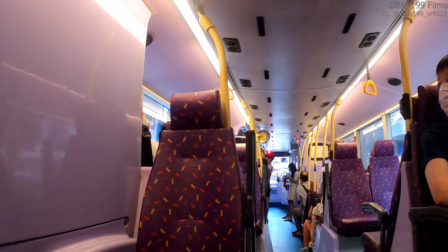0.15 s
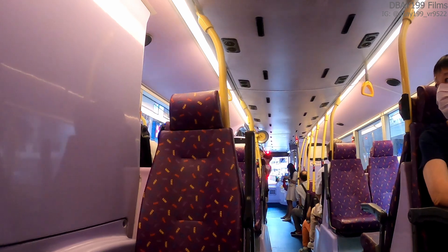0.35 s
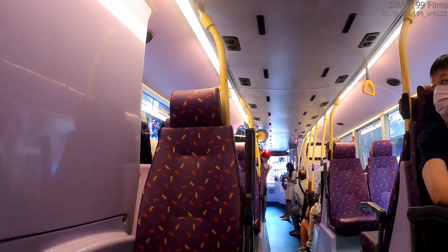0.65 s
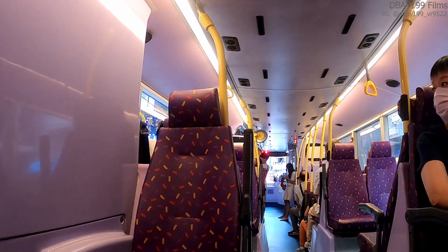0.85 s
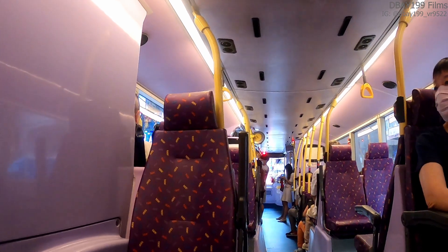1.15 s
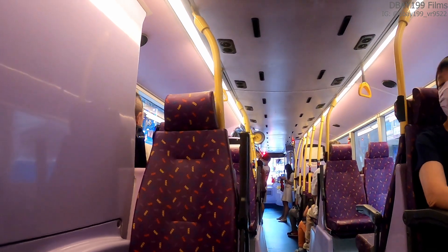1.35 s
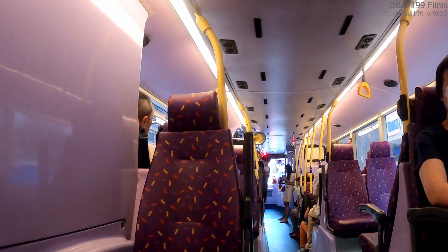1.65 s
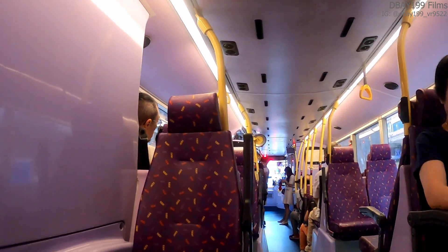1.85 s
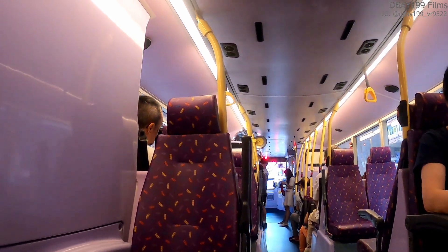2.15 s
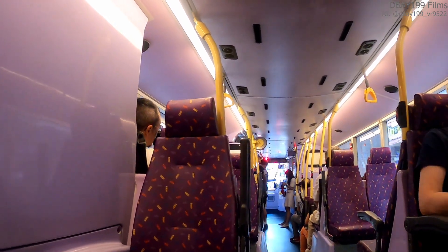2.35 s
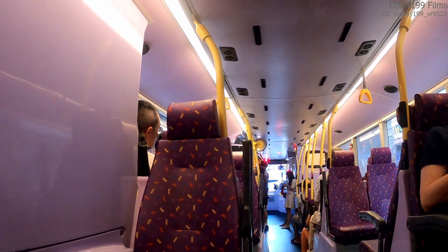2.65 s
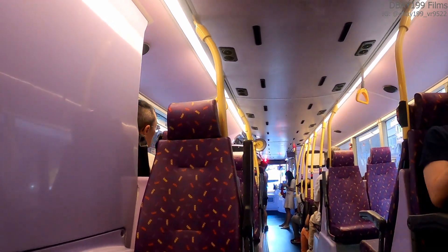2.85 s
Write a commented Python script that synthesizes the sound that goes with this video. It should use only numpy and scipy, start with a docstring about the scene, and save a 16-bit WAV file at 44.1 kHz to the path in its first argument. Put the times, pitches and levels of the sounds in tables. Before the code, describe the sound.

Inside a moving city bus, a continuous deep engine drone dips early and rises late; panels hum, fans blow softly with a thin whistle, and small fittings rattle faintly around the seated microphone.

```python
"""Inside a moving city bus. The diesel booms at its firing rate, sagging and then picking up again;
its orders are sines. Road rumble and vent air are shaped noise; body panels drone with noise and orders.
Fans are unsteady tones, with a whistle among them that fades, then swells late, and a thin whine.
Trim and fittings tick and rattle in short noise bursts; one small metal part pings."""
import sys
import numpy as np
from scipy import signal
from scipy.fft import rfft, irfft, next_fast_len
from scipy.io import wavfile
from scipy.ndimage import uniform_filter1d, minimum_filter1d, map_coordinates

SR = 44100
rng = np.random.default_rng(int(sys.argv[2]) if len(sys.argv) > 2 else 0)


def pcm_store(signal):
    """Save signal as 16-bit PCM."""
    levels = np.round(np.clip(np.atleast_2d(signal), -1, 1) * 32767)
    wavfile.write(sys.argv[1], SR, levels.astype(np.int16).T)


N = 132300
TOP_HZ = 15200  # upper band limit


def amp(db):
    """Decibels to gain."""
    return 10 ** (np.asarray(db) / 20)


def unit(x):
    """Scale to rms 1."""
    return x / np.sqrt(np.mean(x ** 2) + 1e-20)


def along(points, hz):
    """Interpolate (f/Hz, value) points on a log-frequency axis."""
    f, v = np.transpose(points)
    return np.interp(np.log(hz + 1), np.log(f + 1), v)


def curve(rows):
    """Interpolate (t/s, value) points to one value per sample."""
    return np.interp(np.arange(N) / SR, *np.transpose(rows))


def wobble(knots_per_s):
    """Smooth random curve through normal knots."""
    knots = rng.standard_normal(2000)
    return map_coordinates(knots, [np.arange(N) * knots_per_s / SR], mode="mirror")


def filtered(x, response):
    """Apply a frequency response, zero-padded."""
    m = next_fast_len(N + SR // 2)
    return irfft(rfft(x, m) * response(np.fft.rfftfreq(m, 1 / SR)), m)[..., :N]


def pan(db):
    """Left and right gains for a left-minus-right level difference."""
    return amp(np.array([[.5], [-.5]]) * db)


def steady(x):
    """Even out slow chance swells of a noise; rms 1."""
    power = uniform_filter1d(np.mean(x ** 2, axis=0), size=9000)
    return unit(x / np.sqrt(np.abs(power) + 1e-12))


# cabin diffuseness: f/Hz, left-right likeness
CABIN_ALIKE = [(60, 0.98), (250, 1), (450, 0.92), (700, 0.75), (1300, 0.86), (2200, 0.49), (3600, 0.29),
               (8000, 0.18)]
# noise balance: f/Hz, left-right level/dB
NOISE_LEAN = [(30, 0.5), (250, 2), (700, 1.5), (2700, 4), (3600, 3), (5400, 0), (8000, 0.5)]


def rush(colour, patchy_db, alike=CABIN_ALIKE):
    """Patchy stereo noise of rms 1; left-right likeness follows frequency."""
    z = signal.stft(rng.standard_normal((2, N)), nperseg=1024)[2]
    field = rng.standard_normal(z.shape[1:])
    field = uniform_filter1d(field, size=7, axis=0)  # across frequency
    field = uniform_filter1d(field, size=9, axis=1)  # across time
    pair = signal.istft(z * amp(patchy_db * unit(field)), nperseg=1024)[1][:, :N]

    def mid_side(hz):
        turn = np.arccos(np.clip(along(alike, hz), -1, 1)) / 2
        return colour(hz) * [np.cos(turn), np.sin(turn)]

    mid, side = filtered(pair, mid_side)
    stereo = np.array([mid + side, mid - side])
    return unit(filtered(stereo, lambda hz: pan(along(NOISE_LEAN, hz))))


# engine firing rate: t/s, f/Hz
FIRING = [(0, 53.79), (.15, 50.66), (.35, 48.36), (.52, 42.39), (.7, 43.37), (.92, 46.35), (1.15, 44.29),
          (1.55, 45.31), (1.85, 46.5), (2.05, 51.89), (2.5, 51.98), (3, 54.79)]


def firing_phase():
    """Integrate the firing rate to phase in radians."""
    return 2 * np.pi * np.cumsum(curve(FIRING)) / SR


# cabin boom at the firing rate: t/s, level/dB
BOOM = [(0, -19), (.1, -16), (.2, -26.5), (.32, -16), (.7, -15), (1.1, -16), (1.5, -17), (1.85, -14.5),
        (2.1, -24.5), (2.35, -24.5), (3, -20)]
# how hard the engine pulls: t/s, pull (0-1)
PULL = [(0, .6), (.4, 0.3), (1.9, 0), (2.25, 0.94), (3, 1)]
# engine orders: multiple of firing rate, easy level/dB, pulling level/dB
ENGINE_ORDERS = [(.5, -30, -28.5), (1.5, -34.5, -31), (2, -30, -30.5), (2.5, -38.5, -39.5),
                 (4, -48.5, -40.5), (5, -44.5, -40)]


def engine(phase):
    """Firing-rate boom plus weaker wavering orders whose levels shift with pull."""
    boom = amp(curve(BOOM) + 0.39 * wobble(5.3)) * np.sin(phase)
    pull = curve(PULL)
    orders = 0
    for k, easy_db, pull_db in ENGINE_ORDERS:
        level_db = easy_db + pull * (pull_db - easy_db) + 2.26 * wobble(8.3)
        start = rng.uniform(0, 2 * np.pi)
        orders = orders + amp(level_db) * np.sin(k * phase + start + .5 * wobble(7.4))
    return np.sqrt(2) * (boom + orders) * pan(db=.5)


# rumble spectrum: f/Hz, relative level/dB
ROAD_COLOUR = [(5, -30), (11, -7), (22, 1.5), (33, 6), (50, 0), (64, -7.5), (85, -2), (102, -13),
               (150, -22.5), (250, -44.5), (500, -83.5)]
# rumble: t/s, level/dB
ROAD_LEVEL = [(0, -22.5), (.3, -20), (.5, -22.5), (.7, -24.5), (1, -24), (1.3, -18.5), (1.55, -20.5),
              (1.8, -21), (2.1, -19), (2.5, -19), (3, -19)]
# rumble, near mono: f/Hz, left-right likeness
ROAD_ALIKE = [(60, .9998), (250, .995)]


def road():
    """Tyres shake the body: deep noise rumble."""
    rumble = rush(lambda hz: amp(along(ROAD_COLOUR, hz)), patchy_db=1, alike=ROAD_ALIKE)
    return amp(curve(ROAD_LEVEL)) * steady(rumble)


# panel resonances: f/Hz, relative level/dB
PANEL_COLOUR = [(70, -28), (125, 1), (155, -7), (200, -1.5), (228, -1.5), (258, -2), (278, -3), (298, -8),
                (328, -4.5), (350, -8.5), (390, -6.5), (440, -11), (500, -11.5), (600, -18.5), (1000, -31),
                (2500, -77.5)]
# panel drone: t/s, level/dB
PANEL_LEVEL = [(0, -27.5), (.25, -28), (.45, -30), (1, -30), (1.35, -32), (1.8, -30), (2.3, -30),
               (2.7, -29), (3, -26)]
PARTIALS_DB = -1.5  # orders re panel noise


def panels(phase):
    """Panels drone with road noise and engine orders sliding across their resonances."""
    firing_hz = curve(FIRING)
    partials = 0
    for k in np.arange(3, 10, .5):
        level_db = along(PANEL_COLOUR, k * firing_hz) + 2.6 * wobble(6)
        start = rng.uniform(0, 2 * np.pi)
        partials = partials + amp(level_db) * np.sin(k * phase + start + 0.83 * wobble(8))
    noise = rush(lambda hz: amp(along(PANEL_COLOUR, hz)), patchy_db=0.5)
    drone = noise + amp(PARTIALS_DB) * unit(partials) * pan(db=0.2)
    return amp(curve(PANEL_LEVEL)) * steady(drone)


RIPPLE_DB, RIPPLE_HZ = 1.8, 14  # standard deviation, knot spacing


def ripple(hz):
    """Cabin reflections comb the spectrum into fine fixed peaks and dips."""
    knots = rng.standard_normal(4000)
    return amp(RIPPLE_DB * map_coordinates(knots, [hz / RIPPLE_HZ], mode="mirror"))


# vent air spectrum: f/Hz, relative level/dB
AIR_COLOUR = [(200, -35), (600, -2.5), (660, -1), (705, 5), (780, -2), (1100, -2), (1400, -0.5), (1650, -5),
              (2000, -5), (2400, -7.5), (3000, -8), (4600, -14.5), (5800, -19.5), (7000, -23),
              (8400, -25.5), (9500, -38), (11000, -44), (13000, -49.5), (15000, -60.5)]
# vent air: t/s, level/dB
AIR_LEVEL = [(0, -36.5), (.3, -37.5), (.65, -39), (1, -38.5), (1.45, -39.5), (1.9, -39.5), (2.4, -38),
             (2.75, -37.5), (3, -36)]
# outlet resonances: f/Hz, half-width at -12 dB/Hz, relative level/dB
WHISTLE_BANDS = [(3236, 150, -5), (3398, 170, -2), (3590, 310, -3), (3807, 480, -5), (5204, 92, -10.5),
                 (5510, 410, -15.5)]
# whistling bands: t/s, level/dB
WHISTLE_LEVEL = [(0, -40.5), (.5, -40.5), (.9, -42), (1.45, -43.5), (1.8, -41), (2.3, -41.5), (2.75, -40),
                 (3, -40.5)]


def whistle_response(hz):
    """Power sum of the outlet resonances."""
    power = 0
    for centre_hz, width_hz, db in WHISTLE_BANDS:
        power = power + (amp(db) / (1 + ((hz - centre_hz) / width_hz) ** 2) ** 2) ** 2
    return np.sqrt(power)


def vents():
    """Broad air noise plus noise in the outlets' whistling bands."""
    # square root halves the ripple in dB
    air = rush(lambda hz: amp(along(AIR_COLOUR, hz)) * np.sqrt(ripple(hz)), patchy_db=0.5)
    whistle = steady(rush(lambda hz: whistle_response(hz) * ripple(hz), patchy_db=1.7))
    air_gain = amp(curve(AIR_LEVEL) + 0.1 * wobble(8))
    whistle_gain = amp(curve(WHISTLE_LEVEL) + 0.33 * wobble(15))
    return air_gain * air + whistle_gain * whistle


FLUTTER_DB = 2.5


def tone(hz, db, lean_db, drift_hz=4):
    """Unsteady sine; a high one reaches each ear by different paths."""
    phase = 2 * np.pi * np.cumsum(hz + drift_hz * wobble(21.95)) / SR
    apart = np.arccos(np.clip(along(CABIN_ALIKE, hz), -1, 1)) / 2 * wobble(9)
    gain = np.sqrt(2) * amp(db + FLUTTER_DB * wobble(17)) * pan(lean_db)
    return gain * np.sin(phase + np.array([apart, -apart]))


# fan and blower tones: f/Hz, level/dB, left-right level/dB
FAN_TONES = [(171, -42.5, 1), (258, -39.5, 1), (329, -44, 1), (464, -48.5, 2), (474, -53, 2),
             (1326, -59, 2), (1432, -60, 3), (1567, -60.5, 2), (1756, -55, 4), (1768, -63, 3),
             (1840, -55.5, 2), (1988, -65, 5), (2185, -62, 6), (3260, -58.5, 1), (3339, -57.5, 3),
             (3570, -55.5, 2), (5246, -69, 0)]
# vent whistle: t/s, level/dB
SING_LEVEL = [(0, -53), (1.1, -55), (1.85, -57), (2.05, -46), (2.2, -47.5), (2.4, -51), (2.7, -49),
              (2.85, -53), (3, -48)]
SING_HZ = 3600
# thin blower whine: t/s, f/Hz
WHINE = [(0, 3903), (1.4, 3908), (2.2, 3872), (2.8, 3862), (3, 3882)]


def fans():
    """Fan tones, a vent whistle that fades, then swells late, and a thin whine that sags."""
    hum = sum(tone(*row) for row in FAN_TONES)
    sing = tone(SING_HZ, curve(SING_LEVEL), lean_db=-5.5, drift_hz=6)
    whine = tone(curve(WHINE), db=-57.5, lean_db=-1)
    return hum + sing + whine


# loose fittings: t/s, level/dB, e-fold rise/s, T60 decay/s
RATTLES = [(.419, -48.5, .006, .13), (1.15, -63, .02, .38), (1.333, -63, .01, .27),
           (1.639, -47.5, .004, .09), (1.718, -54, .0013, .11), (2.196, -51, .011, .15),
           (2.58, -66, .025, .5)]
# trim clicks: t/s, onset level/dB
CLICKS = [(.4175, -50), (1.637, -44), (1.7165, -39), (2.1945, -48)]
CLICK_T60_S = .005
# rattle spectrum: f/Hz, relative level/dB
RATTLE_COLOUR = [(1500, -35), (4000, -6), (7000, 6.5), (8500, -1), (10000, -10), (12800, -6),
                 (14500, -19.5)]
# rattle stereo: f/Hz, left-right likeness
RATTLE_ALIKE = [(4000, .5), (9000, 0.97), (12000, 1)]


def rattles():
    """Rattles: tiny contacts that swell and die; clicks: single hard contacts."""
    t = np.arange(N) / SR
    level = 0
    for s, db, rise_s, t60_s in RATTLES:
        decay = amp(db - 60 * np.maximum(t - s, 0) / t60_s)
        level = level + decay * np.exp(np.minimum(t - s, 0) / rise_s)
    contacts = unit(amp(3.4 * wobble(600)))
    clicks = sum((t >= s) * amp(db - 60 * np.abs(t - s) / CLICK_T60_S) for s, db in CLICKS)
    noise = rush(lambda hz: amp(along(RATTLE_COLOUR, hz)), patchy_db=0.5, alike=RATTLE_ALIKE)
    return (level * contacts + clicks) * pan(db=1.0) * noise


PING_S, PING_HZ, PING_DB, PING_T60_S = 2.405, 12850, -66.5, .18  # PING_DB is peak
TAP_DB, TAP_T60_S = -66, .015


def ping():
    """A small metal part is tapped (noise burst) and rings once (decaying sine)."""
    t = np.maximum(np.arange(N) / SR - PING_S, 0)
    noise = filtered(rng.standard_normal(N), lambda hz: (hz > PING_HZ) * (hz < TOP_HZ))
    tap = (t > 0) * amp(TAP_DB - 60 * t / TAP_T60_S) * unit(noise)
    ring = amp(PING_DB - 60 * t / PING_T60_S) * np.sin(2 * np.pi * PING_HZ * t)
    return tap + ring


RIGHT_LEADS_S = 1.8e-5


def scene():
    """Sum of all sources, arriving a touch earlier on the right."""
    phase = firing_phase()
    cabin = engine(phase) + road() + panels(phase) + vents() + fans() + rattles() + ping()
    shift_s = RIGHT_LEADS_S / 2 * np.array([[-1], [1]])
    return filtered(cabin, lambda hz: np.exp(2j * np.pi * hz * shift_s))


CEILING_DB, HOLD_S = -7, 0.04


def record(dry):
    """Limiter: gain dips around peaks above the ceiling; then cut all above TOP_HZ."""
    hold = max(int(HOLD_S * SR), 1)
    needed = np.minimum(1, amp(CEILING_DB) / (np.abs(dry).max(axis=0) + 1e-9))
    gain = uniform_filter1d(minimum_filter1d(needed, hold), hold)
    return filtered(dry * gain, lambda hz: hz < TOP_HZ)


dry = scene()
out = record(dry)
pcm_store(out)
```